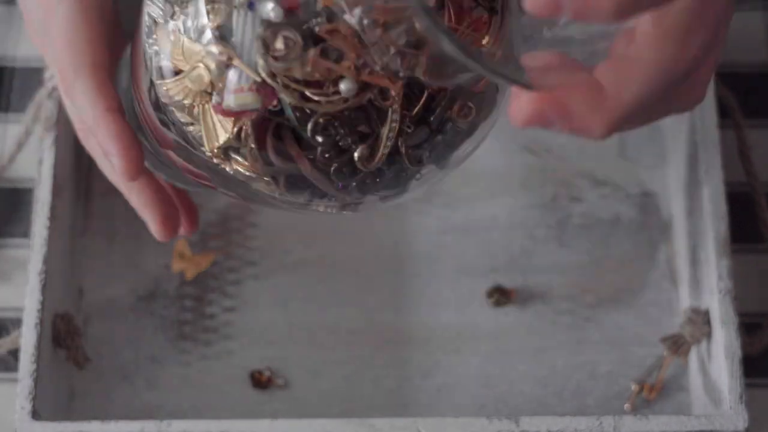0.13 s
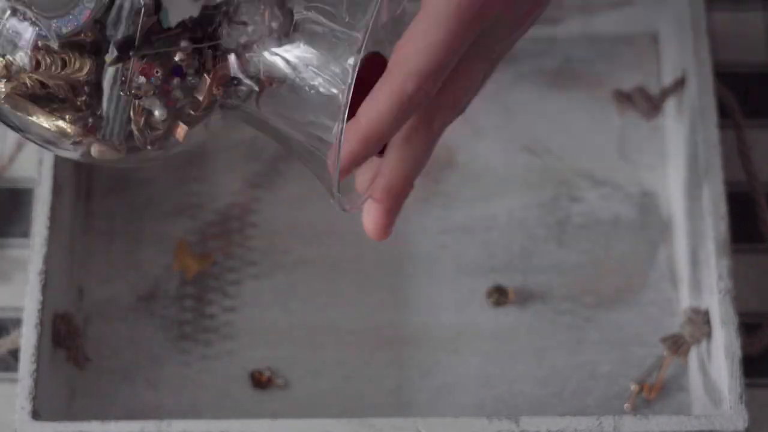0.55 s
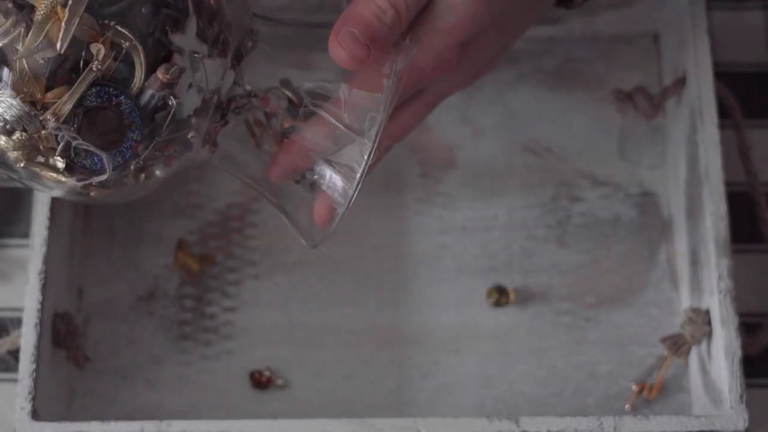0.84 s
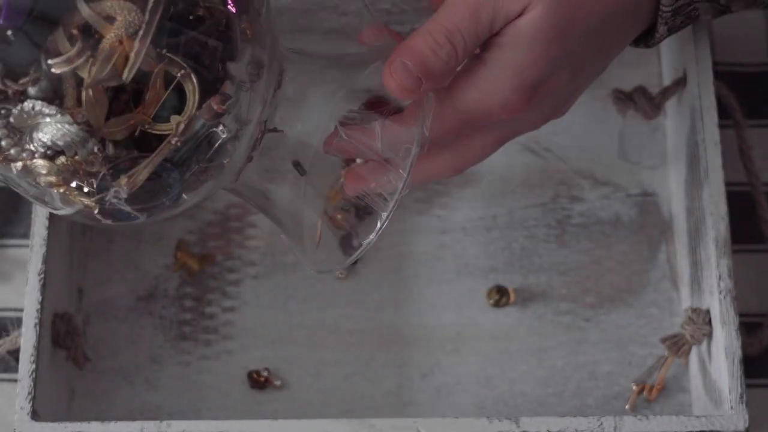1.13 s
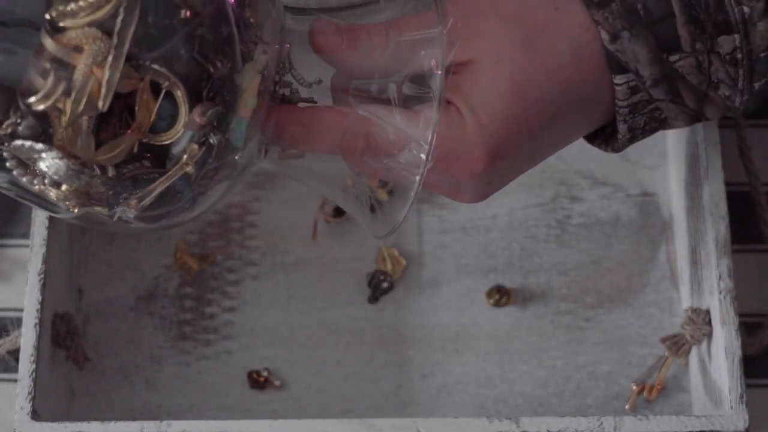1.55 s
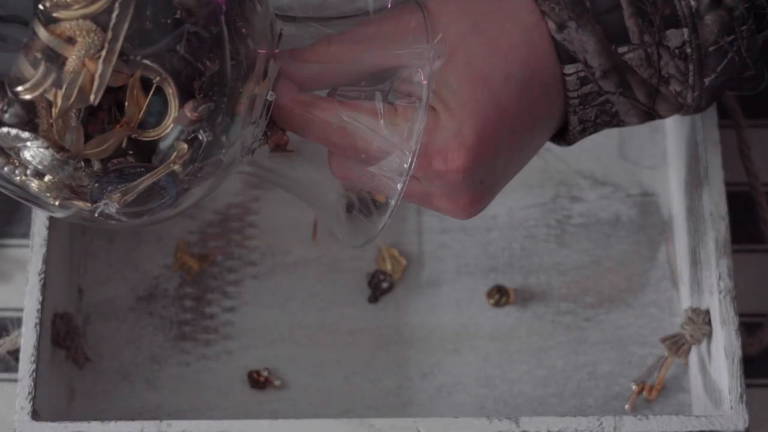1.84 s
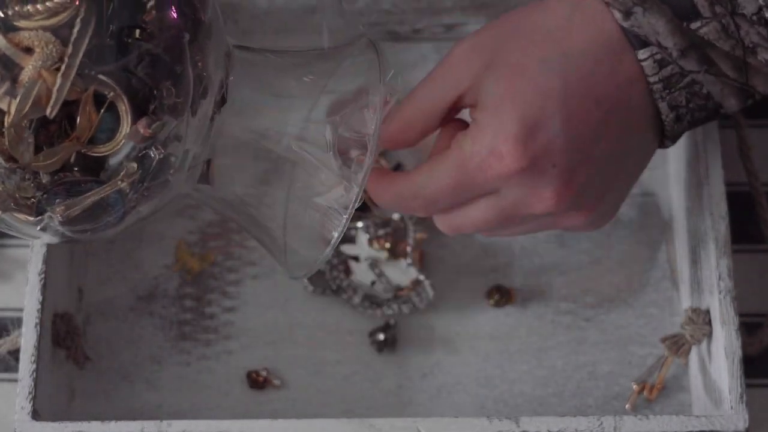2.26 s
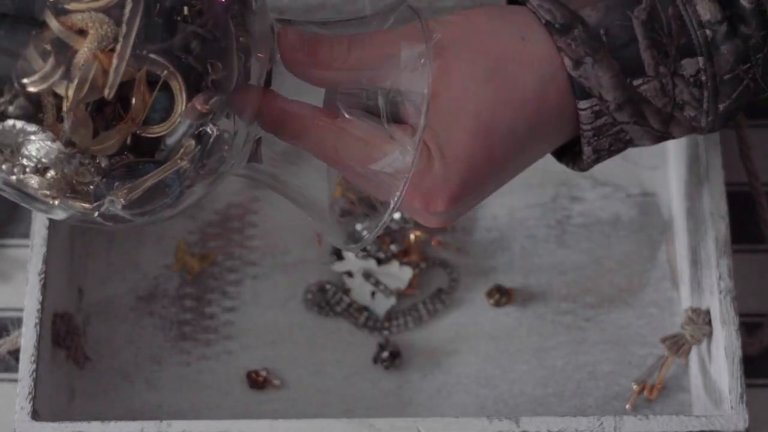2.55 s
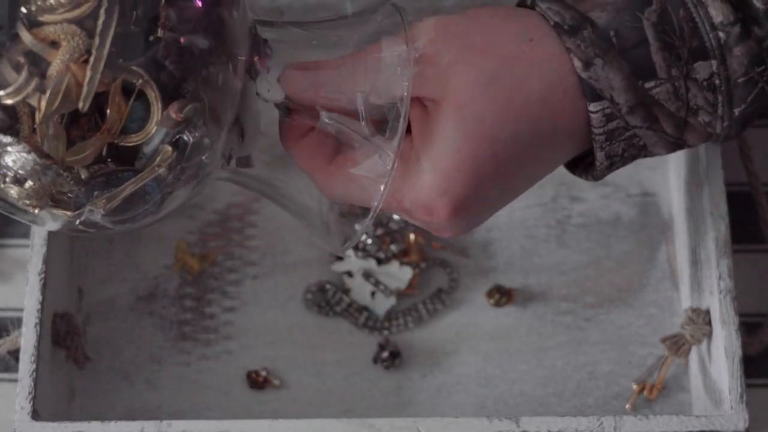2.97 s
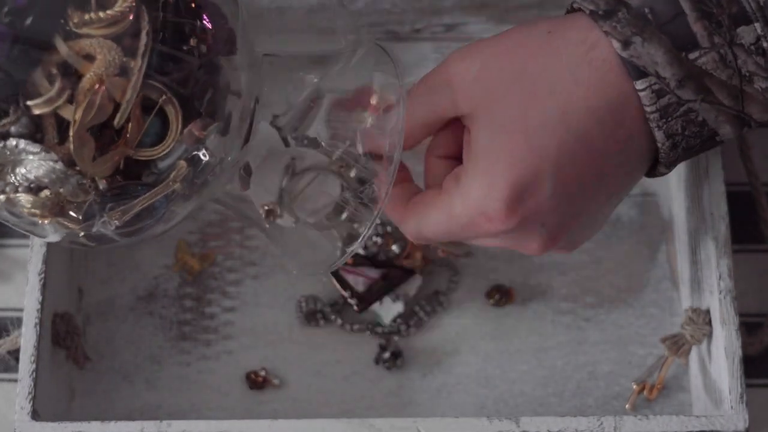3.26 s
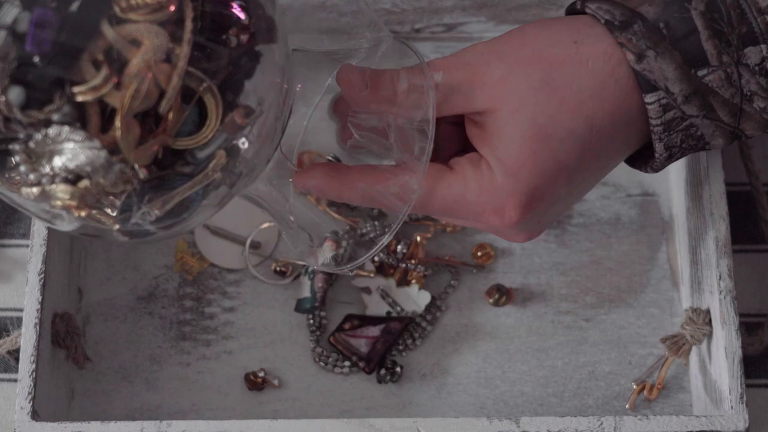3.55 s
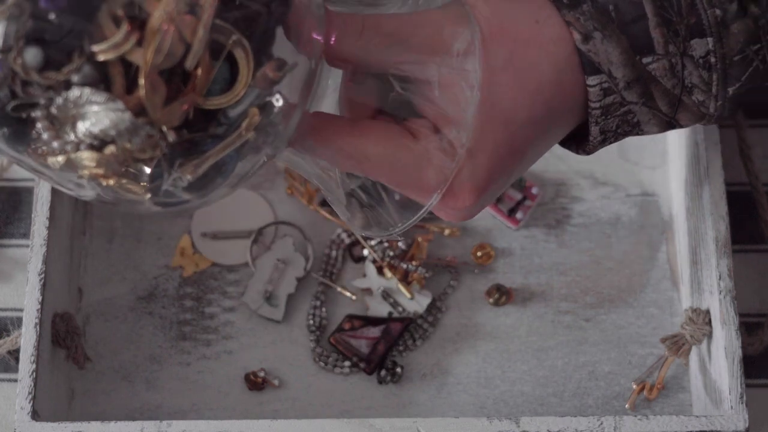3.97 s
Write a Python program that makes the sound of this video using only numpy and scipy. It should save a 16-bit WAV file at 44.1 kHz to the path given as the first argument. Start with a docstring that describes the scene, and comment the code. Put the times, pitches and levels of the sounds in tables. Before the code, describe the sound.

A glass vase stuffed with metal jewelry is tipped over a wooden tray in a small room, heard very close. After near quiet, with faint rumble, hiss and hum, pieces shift at about 0.2 s, and bright hard clinks crowd 0.4-0.7 s; the loudest, near 0.52, overloads with a low thump. Lighter rattling continues until the first handful lands at 1.1-1.4 s, with woody knocks, glass clinks and skittering beads. From 1.5 to 2.1 s there are only soft ticks, scrapes and faint hollow bumps at the vase neck. A second compact drop slaps the tray at 2.2-2.4 s, then small stirrings return. Rattling builds from 2.95 s, with dense glassy clinks around 3.1-3.25. The third, longest spill clatters onto wood at 3.25-3.75 s, scattering tiny taps, with a last faint tap near 3.86 before settling into quiet. Rings are short and damped, and the room's tail is brief.

```python
"""A glass vase full of costume jewelry is tipped over a wooden tray in a small room.
Metal pieces and beads, built from damped modes and short noise, clink against the loaded, damped glass
while fingers tease them through the neck. Three handfuls drop, knock on the tray and skitter to rest,
made of slaps, wood modes and swarms of tiny impacts, over room rumble, hiss and mains hum. The close
microphone overloads: a low thump under the hardest clink, and the sum is clipped, then band-limited."""
import sys
import numpy as np
from scipy import signal
from scipy.fft import rfft, irfft, next_fast_len
from scipy.io import wavfile
from scipy.ndimage import uniform_filter1d

SR = 44100
rng = np.random.default_rng(int(sys.argv[2]) if len(sys.argv) > 2 else 0)


def dump(signal):
    """Clip the signal to [-1, 1] and save it as 16-bit WAV at the path in sys.argv[1]."""
    limited = np.clip(np.atleast_2d(signal).T, -1, 1)
    pcm = np.round(limited * 32767).astype(np.int16)
    wavfile.write(sys.argv[1], SR, pcm)


N = 181405  # length in samples
T = np.arange(SR // 4) / SR  # seconds since a contact


def amp(db):
    """Decibels to gain."""
    return 10 ** (np.asarray(db) / 20)


def unit(x):
    """Scale x to rms 1."""
    return x / np.sqrt(np.mean(x ** 2) + 1e-20)


def blow(x):
    """Scale x to energy 1."""
    return x / (np.linalg.norm(x) + 1e-12)


def fade(t, t60):
    """Exponential decay by 60 dB in t60 seconds."""
    return np.exp(-np.log(1000) * t / t60)


def along(points, hz):
    """Read a curve of (Hz, value) points on a log frequency axis."""
    point_hz, values = np.transpose(points)
    return np.interp(np.log(hz + 1), np.log(point_hz), values)


def add(track, s, sound):
    """Mix a sound into the track at time s in seconds."""
    start = max(0, round(s * SR))
    track[start:start + len(sound)] += sound[:max(0, N - start)]


def through(x, response):
    """Play x through an impulse response."""
    return signal.oaconvolve(x, response)[:len(x)]


def colour(points, size=2048):
    """Minimum-phase impulse response of energy 1 with the given spectrum shape."""
    level_db = along(points, np.fft.rfftfreq(size, 1 / SR))
    cepstrum = irfft(np.log(amp(level_db)))
    # folding the cepstrum onto positive time makes the response causal
    cepstrum[1:size // 2] *= 2
    cepstrum[size // 2 + 1:] = 0
    return blow(irfft(np.exp(rfft(cepstrum))))


def noise_bed(points):
    """Steady coloured noise at rms 1, with the filter's run-in cut off."""
    run_in = 8192
    noise = rng.standard_normal(N + run_in)
    return unit(through(noise, colour(points, size=run_in))[-N:])


def mode(hz, t60):
    """One damped vibration."""
    return np.sin(2 * np.pi * hz * T) * fade(T, t60)


def ring(modes, scatter_db, detune=0.0042):
    """A body struck at a new spot under a new load: every mode gets a new strength, sign and tuning."""
    draws = rng.standard_normal((len(modes), 3))
    total = np.zeros(len(T))
    for (hz, db, t60), (chance, side, load) in zip(modes, draws):
        strength = np.sign(side) * amp(db + scatter_db * chance)
        total += strength * mode(hz * (1 + detune * load), t60)
    return blow(total)


def trinkets(spectrum, low_hz, high_hz, t60, count):
    """Modes (Hz, dB, t60 s) of assorted small pieces, each with its own pitch and decay time around t60."""
    hz = rng.uniform(low_hz, high_hz, count)
    decays = t60 * amp(2.2 * rng.standard_normal(count))
    return np.transpose([hz, along(spectrum, hz), decays])


def burst(t60):
    """A short noisy contact of energy 1."""
    return blow(rng.standard_normal(len(T)) * fade(T, t60))


def struck(sound, db):
    """Scale a hit so that its first 8 ms have the given rms level."""
    return amp(db) * sound / np.sqrt(np.mean(sound[:SR // 125] ** 2))


def contacts(rate, spread_db, even_s):
    """Random tiny impacts of very unequal size (rate per second), evened to a running power of 1."""
    signs, sizes = rng.standard_normal((2, N))
    present = rng.random(N) < rate / SR
    hits = present * np.sign(signs) * amp(spread_db * sizes)
    power = np.abs(uniform_filter1d(hits ** 2, max(1, int(even_s * SR))))
    return hits / np.sqrt(power + 1e-9)


def rattle(hits, modes, share):
    """Many contacts ring a bank of resonators; each contact reaches a random share of the modes."""
    where, out, energy = np.flatnonzero(hits), np.zeros(N), 0
    share = np.clip(share, .01, 1)
    for hz, db, t60 in modes:
        reached = rng.random(len(where)) < share
        push = hits[where] * rng.standard_normal(len(where)) * reached
        pushes = np.bincount(where, push, N)
        # a two-pole resonator: the pole radius sets the decay, its angle the pitch
        radius, turn = fade(1 / SR, t60), 2 * np.pi * hz / SR
        poles = [1, -2 * radius * np.cos(turn), radius ** 2]
        out += amp(db) * signal.lfilter([np.sin(turn)], poles, pushes)
        energy += share * amp(db) ** 2 / (2 - 2 * radius ** 2)
    return out / np.sqrt(energy)


def swells(rows, rise_db_per_s, fall_db_per_s):
    """Gain of movements (time full level is reached s, hold s, dB) that build up, hold and die away."""
    t = np.arange(N) / SR
    power = np.zeros(N)
    for full_s, hold, db in rows:
        rise_db = rise_db_per_s * np.maximum(full_s - t, 0)
        fall_db = fall_db_per_s * np.maximum(t - full_s - hold, 0)
        power += amp(db - rise_db - fall_db) ** 2
    return np.sqrt(power)


# Pieces striking the vase. Each row: start in seconds, level in dB, the piece's own pitch in Hz,
# glass ring in dB against the piece's ring.
VASE_CLINKS = [(.151, -54.5, 4280, -13), (0.189, -60.5, 8850, -6), (.3546, -43.5, 5370, -18),
               (.369, -35, 4150, -2), (0.4072, -12, 4790, -39), (0.429, -12, 4970, -11.5),
               (0.4761, -21, 5020, -14), (0.5146, -26, 5430, -19), (.521, -7, 5100, -2),
               (0.5635, -29, 4760, 1), (.575, -20.5, 5060, 1), (.6335, -24.5, 5180, -8),
               (.6534, -14.5, 4740, -1.5), (.67, -23.5, 4720, -2), (.769, -36.5, 4130, -14.5),
               (.806, -31.5, 6840, -19), (0.9056, -29, 4890, 14), (0.9403, -35, 4770, 4.5),
               (.975, -38, 1510, -6.5), (0.9997, -34.5, 4580, 6.5), (1.0748, -19, 4920, -4.5),
               (1.1196, -21.5, 4280, 2), (1.143, -12.5, 4180, 4), (1.158, -23, 13860, -11),
               (1.2114, -28, 3530, -0.5), (1.2907, -20.5, 9000, -2.5), (1.2957, -21, 4770, -15.5),
               (1.5221, -38, 4200, -7.5), (1.5755, -33.5, 4770, 14), (1.816, -31, 10840, -7),
               (2.069, -40.5, 3600, 0), (2.081, -33.5, 2400, -12), (2.095, -34, 1490, -8),
               (2.1384, -19, 4880, 20), (2.1557, -22.5, 4780, 3), (2.1957, -20, 5800, -6),
               (2.2039, -12.5, 4790, 4), (2.2668, -17, 3515, 3), (2.317, -21, 7070, -3),
               (2.334, -26.5, 6880, 1), (2.379, -23, 5770, 11), (2.538, -41, 4630, 12),
               (2.802, -26.5, 10740, -2.5), (2.8197, -35, 10000, -6), (2.939, -27.5, 11060, -12),
               (2.9612, -30, 11300, 0.5), (3.018, -26, 5430, -11), (3.0661, -14.5, 4170, -1),
               (3.1014, -24.5, 5250, 1), (3.1635, -19.5, 5680, 1.5), (3.173, -26, 5100, 8.5),
               (3.184, -16, 4880, 2), (3.192, -23, 4700, -6), (3.203, -18.5, 4890, 0),
               (3.2135, -12.5, 5700, -1), (3.2209, -14, 4820, 10), (3.2358, -16, 4780, 7.5),
               (3.3557, -16.5, 5200, -8), (3.3916, -16, 4830, 2), (3.5, -20, 4400, 12),
               (3.5345, -9.5, 4650, 1.5), (3.558, -18, 4770, -2), (3.589, -23.5, 10600, 3.5),
               (3.613, -23, 4600, 17), (3.6447, -23, 4710, -3.5), (4.039, -48, 4800, -12)]
# The vase wall, damped by its load and the hand; the heap plays it too.
# Each row: mode in Hz, relative level in dB, t60 in seconds.
GLASS_MODES = [(1570, -16, .06), (3075, -4, .05), (3135, 1, .06), (3400, -13, .04), (4160, -8, .04),
               (4730, 1, .045), (5080, -4, .035), (5820, -3, .045), (6740, -8, .04), (7160, -13, .05),
               (7500, -12, .045), (8000, -14, .035), (8900, -14, .035), (9950, -13, .045),
               (10830, -11, .04), (11100, -12, .035), (12800, -17, .035)]
# Dry tick of chain links and beads, also used by the heap. Each row: frequency in Hz, relative dB per Hz.
TICK_SPECTRUM = [(100, -49), (280, -3), (700, -2.5), (1500, 4), (2300, 0.5), (3500, 9), (5200, 7),
                 (8200, -5.5), (11000, -2.5), (16000, -10)]
# At the soft level ring and crack are about equal; each dB harder costs the crack and overtones 0.35 dB.
SOFT_DB, CRACK_PER_DB = -30, 0.35


def clinks(crack_t60=0.0072, crack_share_db=-4, tinkle_db=-5, chatter_db=-6, chatter_t60=0.063):
    """A piece rings briefly, rings the glass and jostles its neighbours; soft touches are mostly crack."""
    out, tick = np.zeros(N), colour(TICK_SPECTRUM)
    press = 1 - np.exp(-T / .00015)  # the contact force takes a moment to build
    for s, db, hz, glass_db in VASE_CLINKS:
        chatter = amp(chatter_db) * burst(chatter_t60)
        crack = through(burst(crack_t60) + chatter, tick)
        small = trinkets(TICK_SPECTRUM, low_hz=5500, high_hz=15500, t60=.018, count=11)
        overtones = ring(small, scatter_db=3)
        edge = amp(crack_share_db) * crack + amp(tinkle_db) * overtones
        glass = ring(GLASS_MODES, scatter_db=2.5, detune=.005)
        piece = blow(mode(hz, .014))  # wedged in the heap, it stops almost at once
        ringing = blow(piece + amp(glass_db) * glass)
        sound = ringing + amp(CRACK_PER_DB * (SOFT_DB - db)) * edge
        add(out, s, struck(sound * press, db))
    return out


# Each tilt of the vase or pull of the fingers stirs the heap.
# Each row: time full level is reached in seconds, hold in seconds, level in dB.
HEAP_STIRS = [(0.348, 0.091, -46.5), (0.527, 0.017, -34), (0.67, .012, -39), (0.831, 0.027, -31.5),
              (.94, 0.2, -42.5), (1.14, .015, -29.5), (1.27, 0.12, -42), (1.513, 0.086, -46.5),
              (1.694, 0.018, -50.5), (1.784, 0.027, -43.5), (1.862, 0.047, -46.5), (1.99, .07, -44.5),
              (2.076, 0.054, -34.5), (2.221, .085, -33), (2.373, 0.0095, -29.5), (2.47, 0.065, -54.5),
              (2.632, 0.043, -48.5), (2.723, .015, -47), (2.795, .005, -47.5), (2.807, 0.01, -35.5),
              (2.941, 0.07, -33), (3.06, .06, -33.5), (3.152, 0.28, -28), (3.469, 0.3, -36.5),
              (3.778, .1, -43.5)]
# The heap never quite rests while the vase is tipped.
# One row: time full level is reached in seconds, hold in seconds, level in dB.
HEAP_CREEP = (.26, 3.6, -61)


def heap(glass_db=-5, pieces_db=-1, click_db=-8, scrape_db=-11):
    """Slipping links and beads: each contact clicks, rings small pieces and the wall, and scrapes a little."""
    # the heap gives way and jams again
    level = swells([HEAP_CREEP, *HEAP_STIRS], rise_db_per_s=299.5, fall_db_per_s=384)
    hits = level * contacts(rate=450, spread_db=6.0, even_s=0.05)
    wall = rattle(hits, GLASS_MODES, share=.6)
    small = trinkets(TICK_SPECTRUM, low_hz=3283, high_hz=16100, t60=0.02, count=120)
    pieces = rattle(hits, small, share=.05)
    # each contact leaves a short decaying trail of rubbing noise
    rubbing = np.sqrt(np.abs(through(hits ** 2, blow(fade(T, .009)) ** 2)))
    scrape = rubbing * rng.standard_normal(N)
    clicks = through(amp(click_db) * hits + amp(scrape_db) * scrape, colour(TICK_SPECTRUM))
    return amp(glass_db) * wall + amp(pieces_db) * pieces + clicks


# Heavy pieces landing on the tray. Each row: start in seconds, level in dB, deep board ring in dB.
TRAY_KNOCKS = [(1.123, -9.5, -2), (1.144, -16.5, -13), (1.1613, -13.5, -4), (1.2401, -17.5, -2.5),
               (1.2482, -24.5, -0.5), (1.2963, -18, -4.5), (1.377, -33.5, -12), (2.221, -10, 0.5),
               (2.234, -12, -14), (2.2647, -18, -9), (2.2686, -12, -13.5), (2.3252, -22, -11),
               (2.3389, -23.5, -3), (2.3867, -25.5, -5), (2.609, -29.5, -35), (2.634, -39, -25),
               (3.2556, -13.5, 0), (3.2921, -19, 1), (3.3329, -26.5, -2), (3.3533, -14, -14.5),
               (3.373, -12, -8.5), (3.3818, -20, -3.5), (3.408, -15.5, -13.5), (3.4206, -15, -10),
               (3.4362, -18, -9), (3.473, -20.5, -11), (3.4981, -13, -22), (3.5075, -25.5, -15.5),
               (3.586, -20.5, -4.5), (3.6722, -17.5, -8), (3.6996, -23, -3.5), (3.7428, -26.5, -4),
               (3.8588, -29.5, -32)]
# The tray's floor bending as a whole, also under the skitter.
# Each row: mode in Hz, relative level in dB, t60 in seconds.
BOARD_MODES = [(125, -13, .09), (205, -7, .07), (250, 0, .12), (275, -8, .07), (331, -4, .15),
               (385, -8, .06), (442, -5, .11), (499, -5, .1), (581, -4, .09)]
# The tray's higher panel modes, also under the skitter.
# Each row: mode in Hz, relative level in dB, t60 in seconds.
PANEL_MODES = [(770, -6, .04), (880, -5, .05), (997, -3, .06), (1060, -2, .08), (1150, -3, .04),
               (1244, 0, .08), (1378, -1, .06), (1537, -2, .06), (1658, -4, .07), (1836, -4, .05),
               (2159, -5, .06), (2400, -7, .035), (2850, -9, .03), (3500, -10, .03)]
# Light pieces tapping the tray, in the knocks and the skitter.
# Each row: frequency in Hz, relative dB per Hz.
TAP_SPECTRUM = [(40, -32), (110, -48), (260, -18), (450, -21), (680, 1.5), (1200, 7.5), (2300, 4.5),
                (4000, -5.5), (8000, -16.5), (16000, -22.5)]
SLAP_HZ, SLAP_SPREAD_OCTAVES = 1330, 0.23  # pitch of the slap on the wood, varying from spot to spot


def knocks(slap_t60=0.012, tap_db=-1, panel_db=-4, clatter_db=-3, clatter_t60=0.047):
    """A landing piece slaps the wood, clatters and sets the tray's floor ringing."""
    out, tap = np.zeros(N), colour(TAP_SPECTRUM)
    for s, db, board_db in TRAY_KNOCKS:
        slap_hz = SLAP_HZ * 2 ** (SLAP_SPREAD_OCTAVES * rng.standard_normal())
        push = amp(tap_db) * (T == 0) + amp(clatter_db) * burst(clatter_t60)
        slap = blow(mode(slap_hz, slap_t60)) + through(push, tap)
        panel = amp(panel_db) * ring(PANEL_MODES, scatter_db=9, detune=0.0015)
        board = amp(board_db) * ring(BOARD_MODES, scatter_db=4.5, detune=0.0091)
        add(out, s, struck(slap + panel + board, db))
    return out


# Chains and beads running out onto the tray; the table rumble follows them too.
# Each row: time full level is reached in seconds, hold in seconds, level in dB.
TRAY_SPILLS = [(1.125, 0.06, -26.5), (1.243, 0.012, -24.5), (1.355, 0.034, -31.5), (1.48, .12, -50),
               (2.225, .06, -20.5), (2.38, 0.01, -31), (3.258, 0.18, -23), (3.5, 0.012, -24),
               (3.585, 0.017, -28), (3.675, 0.095, -29), (3.85, 0.0069, -37.5)]


def skitter(tap_db=-3, pieces_db=-4, panel_db=-6, board_db=-14):
    """Chains pile up link by link and loose beads bounce: tiny impacts tap, ring pieces and ring the wood."""
    # they arrive almost at once and skitter to rest
    level = swells(TRAY_SPILLS, rise_db_per_s=2508, fall_db_per_s=196.5)
    hits = level * contacts(rate=480, spread_db=4, even_s=0.065)
    taps = through(hits, colour(TAP_SPECTRUM))
    small = trinkets(TAP_SPECTRUM, low_hz=827, high_hz=5083, t60=0.028, count=30)
    pieces = rattle(hits, small, share=.1)
    panel = amp(panel_db) * rattle(hits, PANEL_MODES, share=.6)
    board = amp(board_db) * rattle(hits, BOARD_MODES, share=0.55)
    return amp(tap_db) * taps + amp(pieces_db) * pieces + panel + board


def radiated(x):
    """Bodies this small radiate almost no deep bass: a high-pass at 112 Hz."""
    return signal.sosfilt(signal.butter(4, 112, "highpass", fs=SR, output="sos"), x)


# Fingers bumping the neck stir the air in the vase. Each row: start in seconds, level in dB.
NECK_BUMPS = [(1.513, -49), (1.579, -55.5), (1.70, -55), (2.095, -38), (2.538, -46), (2.795, -56.5),
              (3.062, -46), (3.106, -55.5), (3.165, -52.5)]


def vase_air(air_hz=266, air_t60=0.21):
    """The vase's cavity answers each finger bump with one damped mode."""
    out = np.zeros(N)
    for s, db in NECK_BUMPS:
        add(out, s, struck(mode(air_hz, air_t60), db))
    return out


# Low thump of the overloaded microphone under the hardest clink.
# Each row: frequency in Hz, relative dB per Hz.
THUMP_SPECTRUM = [(40, 16.5), (150, -10), (480, -3), (750, -21.5), (1250, 20), (2200, -2), (5000, -45)]


def overload_thump(thump_s=.5214, thump_db=-22):
    """The overloaded microphone thumps once under the hardest clink: one coloured impulse."""
    out = np.zeros(N)
    add(out, thump_s, struck(colour(THUMP_SPECTRUM), thump_db))
    return out


# How long the room's tail lasts. Each row: frequency in Hz, t60 in seconds.
ROOM_DECAY = [(150, 0.22), (1200, 0.25), (5000, 0.15), (14000, 0.11)]


def room(x, wet_db=-11, wall_db=-19, wall_s=.0108):
    """One near surface echoes, and the room's tail dies away at a rate set by frequency."""
    hz, t, z = signal.stft(rng.standard_normal(SR // 2), SR, nperseg=256)
    decay = fade(t, along(ROOM_DECAY, hz)[:, None])
    tail = signal.istft(z * decay, SR, nperseg=256)[1]
    response = amp(wet_db) * blow(np.pad(tail, (SR // 500, 0)))  # the tail starts 2 ms late
    response[round(wall_s * SR)] += amp(wall_db)
    return x + through(x, response)


# The table under the tray. Each row: frequency in Hz, relative dB per Hz.
TABLE_SPECTRUM = [(10, -16), (25, 4), (40, 7.5), (60, -20.5), (110, -31.5), (400, -70)]


def table(rumble_db=-33, rise_db_per_s=300, fall_db_per_s=45):
    """The table rumbles faintly under the weight of each spill: low noise that follows the spill levels."""
    level = swells(TRAY_SPILLS, rise_db_per_s, fall_db_per_s)
    return amp(rumble_db) * level * noise_bed(TABLE_SPECTRUM)


# The still room. Each row: frequency in Hz, relative dB per Hz.
QUIET_SPECTRUM = [(10, -20), (25, -15), (45, -16.5), (110, -25.5), (200, -16.5), (330, -14), (600, -17.5),
                  (1200, -19), (2500, -29.5), (5000, -35.5), (16000, -50.5)]


def background(air_db=-63, hum_db=-63):
    """Low room rumble and faint hiss as coloured noise, plus mains hum as a 60 Hz sine."""
    air = noise_bed(QUIET_SPECTRUM)
    hum = unit(np.sin(2 * np.pi * 60 * np.arange(N) / SR))
    return amp(air_db) * air + amp(hum_db) * hum


def scene():
    """Vase and tray, close by, in the room."""
    jewelry = radiated(clinks() + heap() + knocks() + skitter())
    close = jewelry + vase_air() + overload_thump()
    return (room(close) + table() + background())[None]


def record(dry):
    """The recorder clips at full scale and keeps nothing above its band limit."""
    top_hz = 15870
    size = next_fast_len(N + SR // 4)
    passed = np.fft.rfftfreq(size, 1 / SR) < top_hz
    clipped = np.clip(dry, -1, 1)
    return irfft(rfft(clipped, size) * passed, size)[..., :N]


dry = scene()
out = record(dry)
dump(out)
```